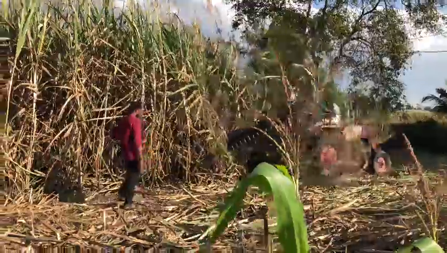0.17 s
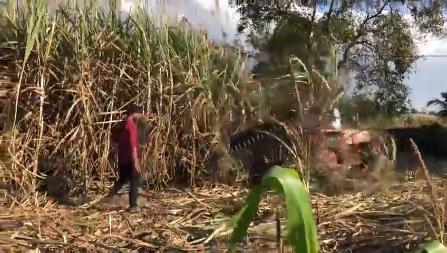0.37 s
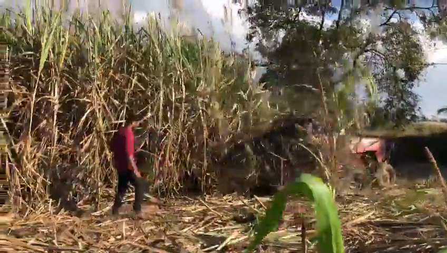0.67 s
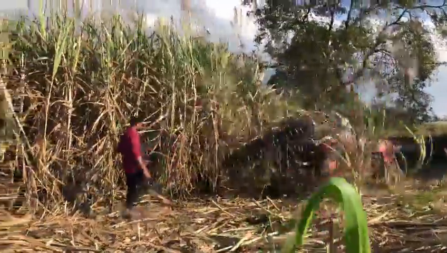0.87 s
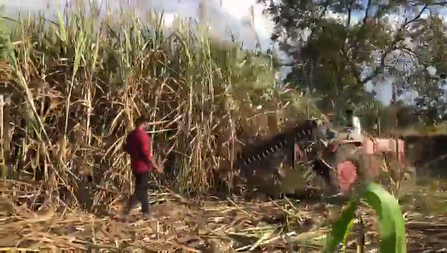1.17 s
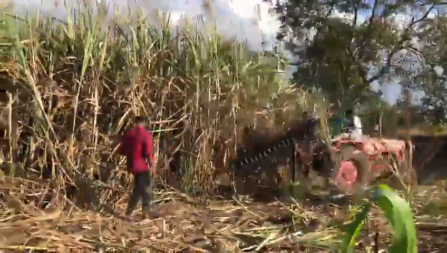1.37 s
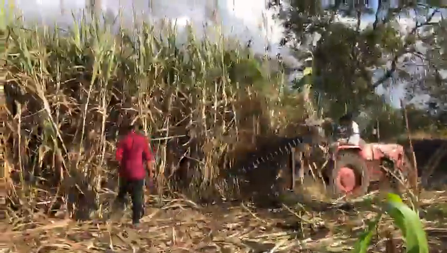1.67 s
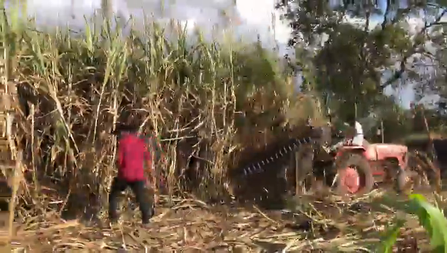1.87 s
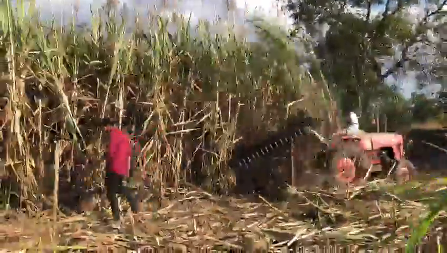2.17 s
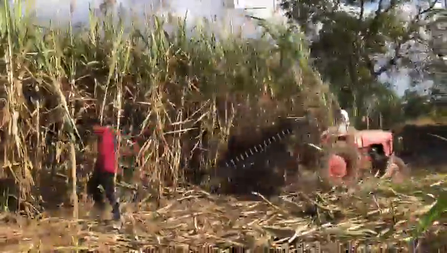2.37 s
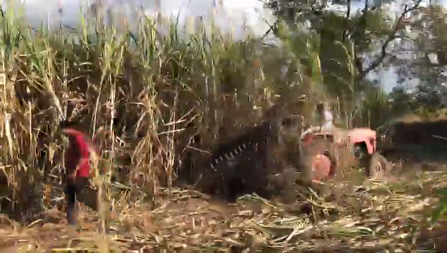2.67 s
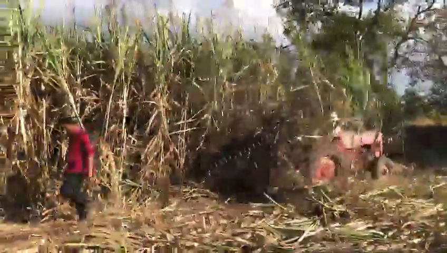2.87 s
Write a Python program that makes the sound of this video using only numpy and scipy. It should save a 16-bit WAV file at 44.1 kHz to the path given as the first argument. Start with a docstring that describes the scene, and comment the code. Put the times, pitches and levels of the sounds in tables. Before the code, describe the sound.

Loud fast metallic chatter of a tractor cane harvester, with coarse roar and crackling leaf hiss.

```python
"""Tractor and cane cutter in a dry field

A diesel tractor drives a cane cutter, heard from some way off by a mono microphone after a short silence.
The cutter knocks about 27 times a second on a rattling steel frame, built from ringing modes; the exhaust
drones as low sine orders; roar, shredded leaves and rumble are banded noise; a thin panel rings to dense taps.
Snaps are ringing noise bursts; dull thumps near the microphone are short swelling sines."""
import sys
import numpy as np
from scipy import signal
from scipy.io import wavfile

SR = 44100
rng = np.random.default_rng(int(sys.argv[2]) if len(sys.argv) > 2 else 0)


def ratio_of_db(decibels):
    """Turn decibels (scalar or array-like) into linear amplitude factors; 0 dB maps to 1."""
    return 10 ** (np.asarray(decibels, float) / 20)


def store_pcm(level_fs):
    """Save levels as 16-bit WAV."""
    pcm = np.round(np.clip(level_fs, -1, 1) * 32767).astype(np.int16)
    wavfile.write(sys.argv[1], SR, np.atleast_2d(pcm).T)


N = 133623

# roar level, whose course the frame rattle also follows: time_s, level_db
ROAR_LEVEL = [(0.16, -18.5), (0.17, -18), (0.82, -17), (0.84, -19), (0.86, -17), (0.87, -17.5), (2.98, -18),
              (3.02, -19)]


def rms_one(x):
    """Scale to rms 1."""
    return x / np.sqrt(np.mean(x ** 2) + 1e-20)


def curve(rows):
    """Rows of (time_s, value) interpolated at every sample."""
    return np.interp(np.arange(N) / SR, *np.transpose(rows))


def drift(rate_hz):
    """Slow random wander of spread 1: noise through two equal poles, run at SR / 40."""
    r = np.exp(-2 * np.pi * rate_hz * 40 / SR)
    noise = rng.standard_normal(N // 40 + 2002)
    slow = signal.lfilter([1], [1, -2 * r, r * r], noise)[2000:]  # settled part
    return np.interp(np.arange(N) / 40, np.arange(len(slow)), rms_one(slow - slow.mean()))


def ring(clicks, hz, t60_s):
    """Two-pole resonator: a unit click starts a decaying sine of height 1."""
    r = ratio_of_db(-60 / (t60_s * SR))
    w = 2 * np.pi * hz / SR
    return signal.lfilter([0, np.sin(w)], [1, -2 * r * np.cos(w), r * r], clicks + 1e-18)


def grains(per_s, size_db):
    """Random clicks of uneven size and sign."""
    size = ratio_of_db(size_db * np.minimum(rng.exponential(1, N), 5))
    sign = rng.choice([-1, 1], N)
    return size * sign * (rng.random(N) < per_s / SR)


def coloured(sources, spectrum, patchy_db):
    """Third-octave bands, alternating between two sources, each with its level and flicker; rms 1."""
    hz, db = np.transpose(spectrum)
    octaves = np.log2(min(hz[-1], 14000) / hz[0])
    edges_hz = hz[0] * 2 ** np.arange(0, octaves + 0.3, 1 / 3)
    out, shared = 0, drift(8.8)
    for k, (low, high) in enumerate(zip(edges_hz, edges_hz[1:])):
        band_filter = signal.butter(2, [low, high], "band", fs=SR, output="sos")
        band = signal.sosfilt(band_filter, sources[k % 2])
        band_db = np.interp(np.log(low * high) / 2, np.log(hz), db)
        flicker_db = patchy_db * (0.22 * shared + drift(15.0))
        out = out + band * ratio_of_db(band_db + flicker_db)
    return rms_one(out)


def cutter():
    """Each stroke's main knock and lesser contacts ring the frame modes; random clicks make it rattle."""
    # stroke count at the anchor times
    stroke_no = (0, 10, 45, 53, 62, 74, 76)
    # times of those strokes: time_s
    stroke_s = (.181, .560, 1.8735, 2.1705, 2.509, 2.970, 3.046)
    # knock drive, ahead of mode gain: time_s, level_db
    knock_level = [(.15, -12), (.3, -13.5), (.5, -14.5), (.7, -10), (.9, -12), (1.1, -11.5), (1.3, -11.5),
                   (1.6, -11.5), (1.8, -10.5), (2.05, -10), (2.3, -13), (2.5, -10.5), (2.7, -13),
                   (3.03, -14.5)]
    # stroke numbers of the hardest strokes
    hard_no = (14, 15, 18, 22, 28, 33, 36, 37, 40, 48, 50, 61, 68, 72)
    # their added drive: extra_db
    hard_db = (2.9, 3.6, 2.3, 4.9, 2.7, 3.4, 2.7, 6.2, 5.1, 2.3, 3.8, 1.3, 5.8, 5)
    # lesser contacts of each stroke: delay_s, level_db, jitter_s
    contacts = [(-.0055, -9, .0012), (.003, -12, .001), (.0075, -12, .002)]
    # frame modes: pitch_hz, gain_db, t60_s
    frame = [(593, -14.5, 0.02), (1038, -11.5, 0.019), (1194, 0.5, 0.011), (1350, 6, 0.0093),
             (1547, -11, 0.025), (1830, -9, 0.016), (2490, -11, 0.019), (3025, -13, 0.01),
             (3695, -13, 0.011)]
    knock_spread_db, mode_spread_db, contact_s = 1.0, 2.0, 0.0017
    rattle_per_s, rattle_size_db, rattle_db, rattle_pulse_db = 900, 2, -23, 1.5
    rattle_tilt = 0.44  # share of the modes' dB differences kept in the rattle

    number = np.arange(stroke_no[-1])
    at_s = np.interp(number, stroke_no, stroke_s)
    stroke_db = np.interp(at_s, *np.transpose(knock_level))
    stroke_db[list(hard_no)] += hard_db
    main = (0.0024, 0.0044, 0.0006)  # delay_s, level_db, jitter_s
    delay_s, contact_db, jitter_s = np.vstack([main, contacts]).T
    shape = (len(at_s), len(delay_s))
    hit_s = at_s[:, None] + delay_s + jitter_s * rng.standard_normal(shape)
    hit_db = stroke_db[:, None] + contact_db + knock_spread_db * rng.standard_normal(shape)
    index = np.clip(((hit_s - contact_s) * SR).astype(int), 0, N - 1).ravel()

    # the blade pushes through for a moment, which softens each onset
    t = np.arange(-2 * contact_s, 2 * contact_s, 1 / SR)
    push = np.exp(-2 * (t / contact_s) ** 2)
    knock, rattle = 0, 0
    for k, (hz, mode_db, t60_s) in enumerate(frame):
        click_db = hit_db.ravel() + mode_db + rng.normal(0, mode_spread_db, len(index))
        clicks = np.zeros(N)
        clicks[index] = ratio_of_db(click_db) * (-1) ** (k // 2 + 1)
        swell = 2 * push * np.cos(2 * np.pi * hz * t) / np.sum(push)
        knock = knock + signal.fftconvolve(ring(clicks, hz, t60_s), swell, "same")
        shaken = ring(grains(rattle_per_s / len(frame), rattle_size_db), hz, t60_s)
        rattle = rattle + ratio_of_db(rattle_tilt * mode_db) * shaken

    phase = 2 * np.pi * np.interp(np.arange(N) / SR, stroke_s, stroke_no)
    course_db = curve(ROAR_LEVEL)
    level_db = rattle_db + course_db - course_db.mean() + rattle_pulse_db * np.cos(phase)
    return knock + ratio_of_db(level_db) * rms_one(rattle)


def exhaust():
    """Sine orders of the firing rate, wavering in pitch and level; load moves those above the first."""
    # exhaust orders: multiples of the firing rate
    orders = (1, 2, 2.5, 2.75, 3)
    # their base rms, ahead of load and waver: level_db
    orders_db = (-30, -28, -40.5, -50.5, -43.5)
    # engine load on the orders above the first: time_s, change_db
    load = [(.15, -2.5), (1, -1), (1.8, -1.5), (2.4, 0), (3.03, -3)]
    firing_hz, pitch_waver_hz, level_waver_db = 55.85, 0.23, 1.2
    phase = 2 * np.pi * np.cumsum(firing_hz + pitch_waver_hz * drift(2.2)) / SR
    load_db = curve(load)
    drone = 0
    for order, base_db in zip(orders, orders_db):
        level_db = base_db + (order > 1) * load_db + level_waver_db * drift(7.8)
        drone = drone + np.sqrt(2) * ratio_of_db(level_db) * np.sin(order * phase)
    return drone


def roar():
    """Broad flickering noise of engine, fan and gears, thinned below 430 Hz."""
    # roar spectrum, relative: pitch_hz, density_db (per Hz)
    spectrum = [(220, -42), (380, -15.5), (589, -0.5), (853, -5.5), (1000, -1.5), (1280, -2.5),
                (1690, -5.5), (1850, -3.5), (2150, -7), (2500, -6.5), (2830, -13), (6000, -12.5),
                (7800, -29), (13200, -120)]
    noise = coloured(rng.standard_normal((2, N)), spectrum, patchy_db=0.94)
    noise = signal.sosfilt(signal.butter(3, 430, "high", fs=SR, output="sos"), noise)
    return ratio_of_db(curve(ROAR_LEVEL) - 3) * noise


def leaves():
    """Dry leaves torn in the cutter: noise hiss mixed with random-click crackle, in shaped bands."""
    # leaf spectrum, relative: pitch_hz, density_db (per Hz)
    spectrum = [(1500, -17), (2500, -5), (3600, -3.5), (5000, -5.5), (7000, -4), (9000, -4.5),
                (10500, -7.5), (12000, -17), (14000, -36)]
    # leaf level, ahead of a fixed trim: time_s, level_db
    leaf_level = [(0.16, -27), (0.56, -24.5), (0.76, -26.5), (0.85, -21), (1.07, -24.5), (1.09, -18.5),
                  (1.18, -21.5), (1.76, -20.5), (1.93, -22.5), (2.36, -22), (2.39, -18), (2.46, -22.5),
                  (2.49, -20.5), (2.72, -21.5), (2.74, -19.5), (2.84, -22), (3.02, -21.5)]
    # gain of the hiss above the shelf: time_s, gain_db
    shine = [(.15, 0.5), (.8, -1), (1.1, -2), (1.8, -1.5), (2.0, -2), (2.4, -1.5), (3.03, 1)]
    crackle_per_s, crackle_size_db, crackle_share, shelf_hz = 2500, 2.5, 0.38, 6040
    crackle = []
    for _ in range(2):
        rate_per_s = crackle_per_s * ratio_of_db(3.0 * drift(13.0))
        crackle.append(rms_one(grains(rate_per_s, crackle_size_db)))
    noise = rng.standard_normal((2, N))
    sources = np.sqrt(1 - crackle_share) * noise + np.sqrt(crackle_share) * np.array(crackle)
    hiss = coloured(sources, spectrum, patchy_db=1.19)
    dull = signal.lfilter(*signal.butter(1, shelf_hz, fs=SR), hiss)
    return ratio_of_db(curve(leaf_level) + 0.75) * (dull + ratio_of_db(curve(shine)) * (hiss - dull))


def snaps():
    """Stalks and leaves snapping: each a decaying noise burst ringing at its own pitch."""
    # snaps: start_s, peak_db, pitch_hz
    snap_rows = [(.835, -9, 8500), (.852, -13, 3800), (1.09, -16, 6500), (2.056, -9, 2980),
                 (2.094, -7, 3700), (2.39, -13, 7000), (2.738, -19, 3020)]
    ring_cycles, burst_decay_s = 19, 0.0017
    out = np.zeros(N + SR)
    t = np.arange(SR // 20) / SR
    for start_s, peak_db, hz in snap_rows:
        noise = rng.standard_normal(len(t)) * np.exp(-t / burst_decay_s)
        burst = ring(noise, hz, ring_cycles / hz)
        start = int(start_s * SR)
        out[start:start + len(t)] += ratio_of_db(peak_db) * burst / np.abs(burst).max()
    return out[:N]


def thumps():
    """Dull thumps near the microphone: short low sines under a bell-shaped swell."""
    # thumps: centre_s, envelope_peak_db, pitch_hz, length_s
    thump_rows = [(0.241, -22, 70, 0.035), (1.341, -17.5, 261, 0.014), (2.13, -22, 129, 0.023),
                  (2.54, -15, 122, 0.015), (2.665, -20, 255, 0.02), (2.765, -19.5, 168, 0.025),
                  (2.80, -25, 128, 0.037), (2.83, -14.5, 324, 0.0095), (2.834, -15, 203, 0.015),
                  (2.94, -13, 120, 0.025), (2.953, -13, 275, 0.013), (2.967, -11, 101, 0.018)]
    out = np.zeros(N)
    for centre_s, peak_db, hz, length_s in thump_rows:
        t = np.arange(N) / SR - centre_s
        swell = np.exp(-2 * (2 * t / length_s) ** 2)
        out += ratio_of_db(peak_db) * swell * np.sin(2 * np.pi * hz * t)
    return out


def panel():
    """Dense small taps keep a loose thin panel ringing near 1 kHz."""
    # panel rms: time_s, level_db
    panel_level = [(.15, -28.5), (.55, -29), (.8, -30), (1.1, -31), (1.5, -38), (2.2, -34), (2.6, -29),
                   (3.03, -35)]
    taps = grains(400.0, 2.3)
    return ratio_of_db(curve(panel_level)) * rms_one(ring(taps, hz=1024, t60_s=0.037))


def rumble():
    """Low noise of machines and ground, with a low-middle noise that fills in over time."""
    # rumble spectrum, relative: pitch_hz, density_db (per Hz)
    low_spectrum = [(36, -24), (45, -8), (70, -4), (130, 0), (190, -3.5), (240, -12.5), (300, -25)]
    # rumble level: time_s, level_db
    low_level = [(.15, -32), (.5, -35.5), (1, -34), (1.5, -33), (2, -34), (2.3, -32), (2.6, -30),
                 (2.8, -25.5), (3.03, -28)]
    # low-middle spectrum, relative: pitch_hz, density_db (per Hz)
    middle_spectrum = [(180, -25), (230, -1), (330, -5.5), (450, 0.5), (560, -11)]
    # low-middle level: time_s, level_db
    middle_level = [(.15, -49), (.6, -51), (1.1, -45), (1.5, -39), (2, -41), (2.4, -38), (2.8, -38),
                    (3.03, -35.5)]
    low = coloured(rng.standard_normal((2, N)), low_spectrum, patchy_db=4.0)
    low = signal.sosfilt(signal.butter(3, 42, "high", fs=SR, output="sos"), low)
    middle = coloured(rng.standard_normal((2, N)), middle_spectrum, patchy_db=1.5)
    return ratio_of_db(curve(low_level)) * low + ratio_of_db(curve(middle_level)) * middle


def scene():
    """All sources sum at one microphone, copied to two equal channels."""
    machine = cutter() + exhaust() + roar() + panel() + rumble()
    mono = machine + leaves() + snaps() + thumps()
    return np.array([mono, mono])


def low_pass(x):
    """Removes everything above the highest recorded frequency."""
    return signal.sosfilt(signal.butter(12, 12240, fs=SR, output="sos"), x)


def record(dry):
    """The recorder rounds the peaks, cuts the top and opens after a silence."""
    ceiling, cut_hz, start_s = 1.1, 11780, 0.148
    rounded = ceiling * np.tanh(dry / ceiling)
    x = signal.sosfilt(signal.ellip(10, 0.5, 60, cut_hz, fs=SR, output="sos"), rounded)
    return low_pass(x * (np.arange(N) >= start_s * SR))


dry = scene()
out = record(dry)
store_pcm(out)
```